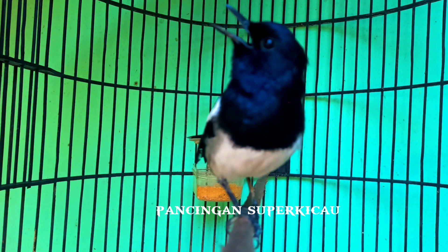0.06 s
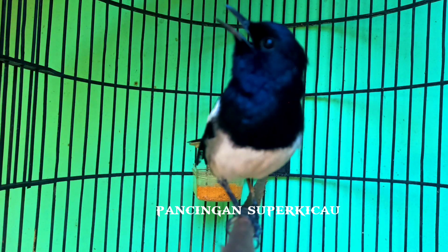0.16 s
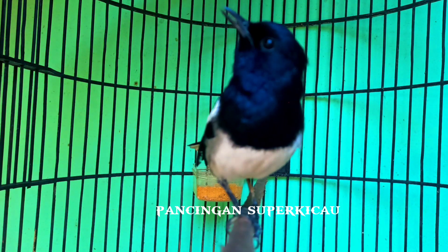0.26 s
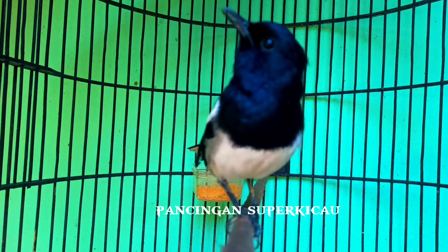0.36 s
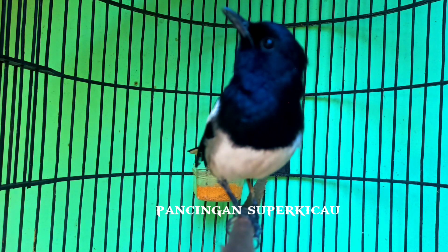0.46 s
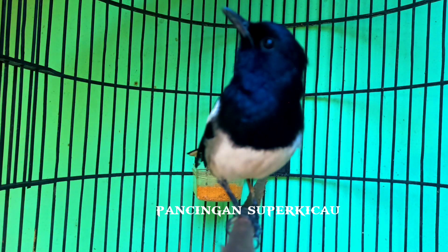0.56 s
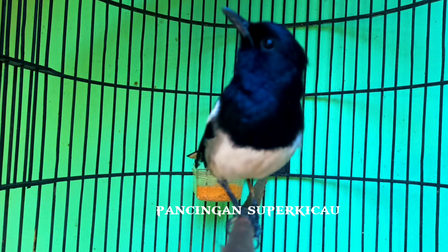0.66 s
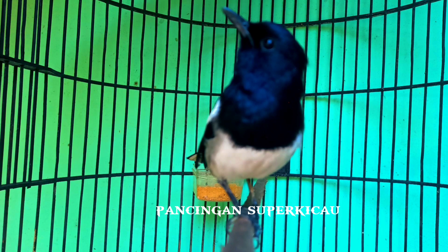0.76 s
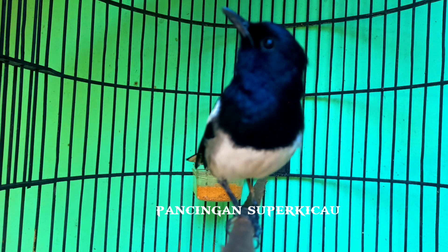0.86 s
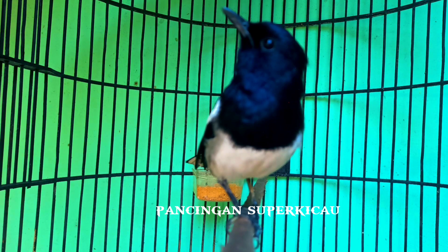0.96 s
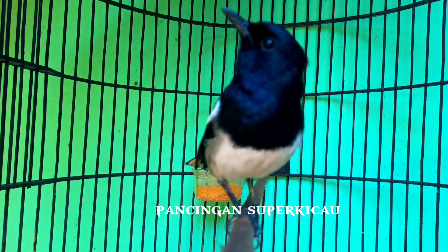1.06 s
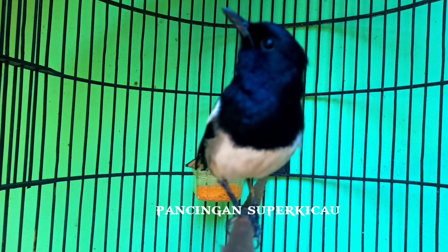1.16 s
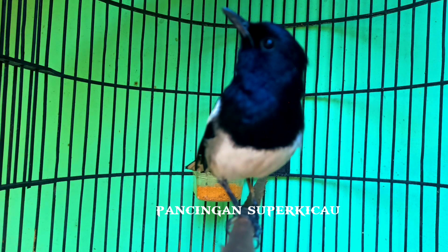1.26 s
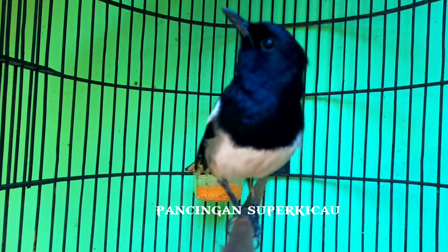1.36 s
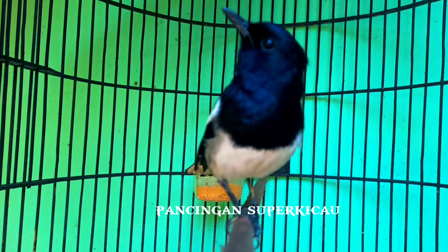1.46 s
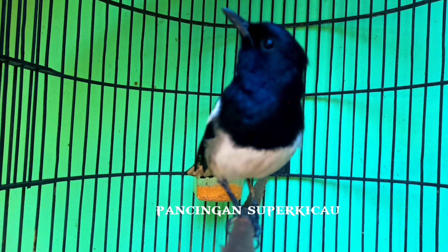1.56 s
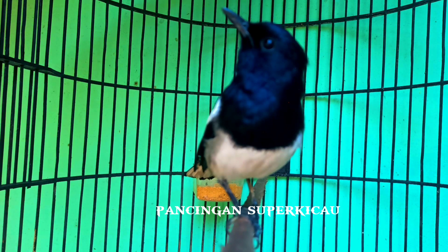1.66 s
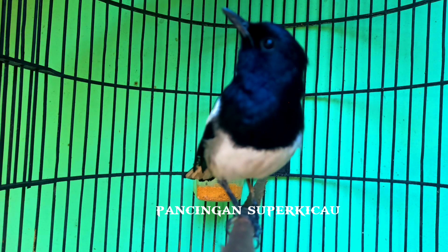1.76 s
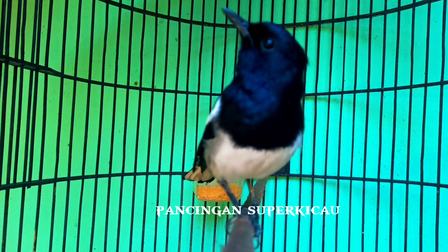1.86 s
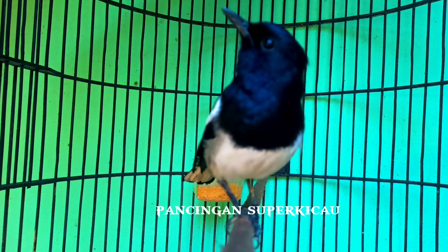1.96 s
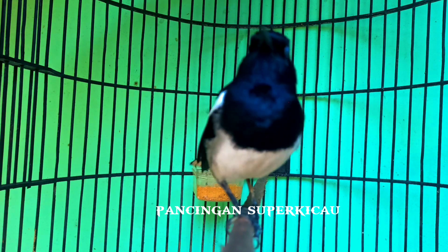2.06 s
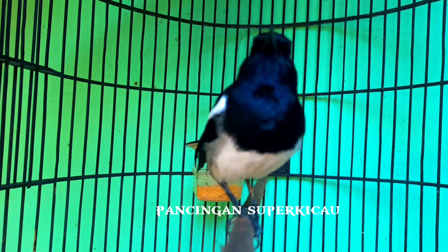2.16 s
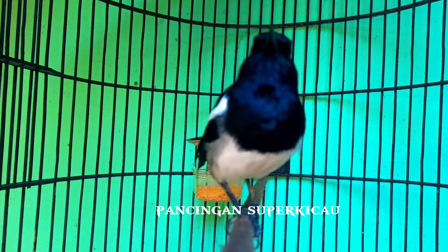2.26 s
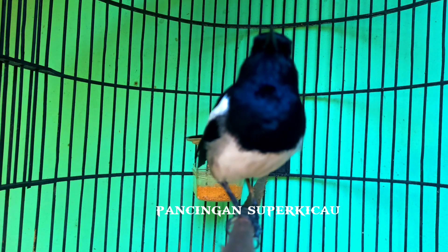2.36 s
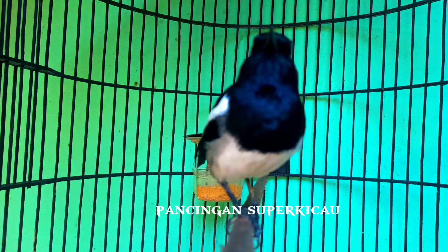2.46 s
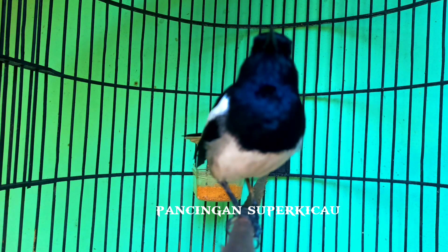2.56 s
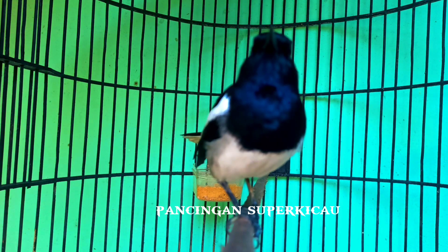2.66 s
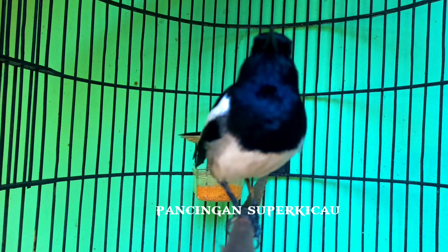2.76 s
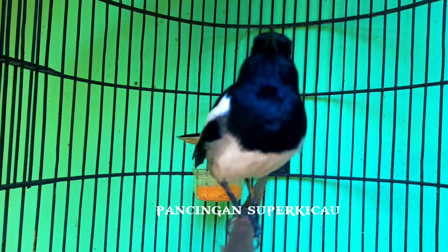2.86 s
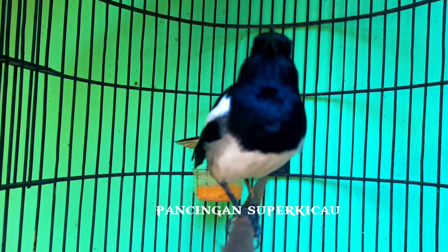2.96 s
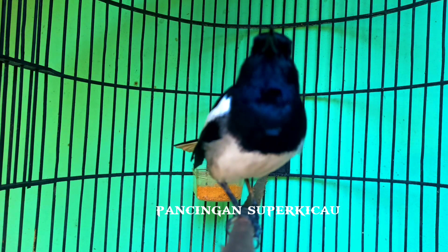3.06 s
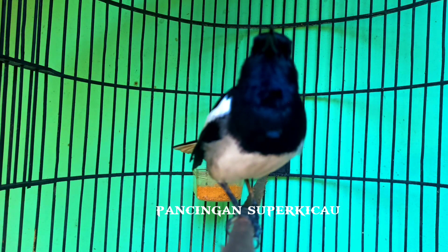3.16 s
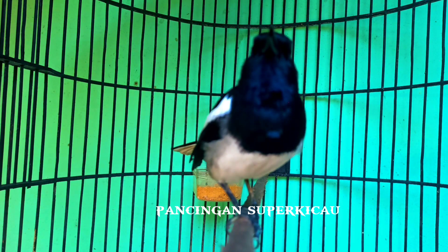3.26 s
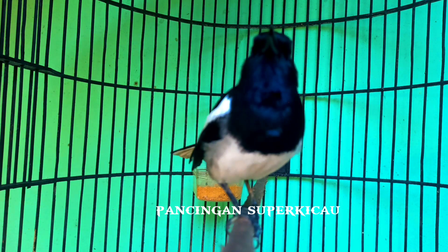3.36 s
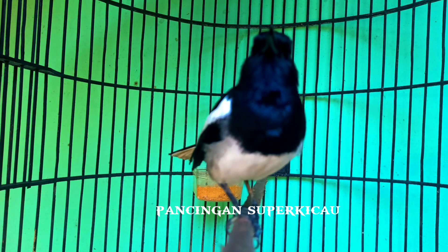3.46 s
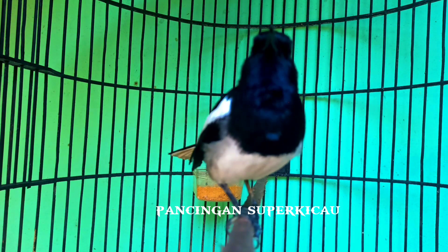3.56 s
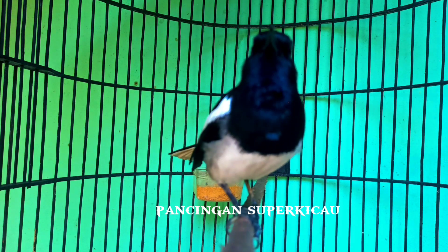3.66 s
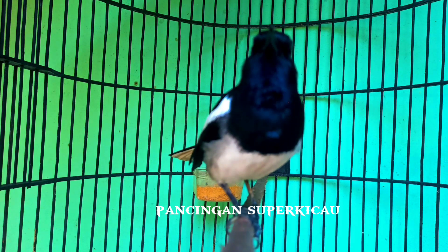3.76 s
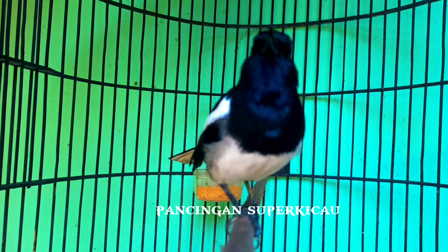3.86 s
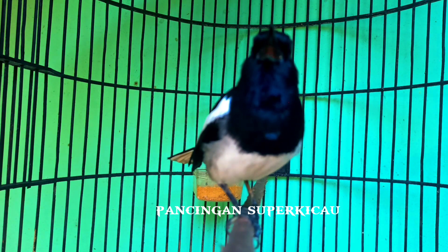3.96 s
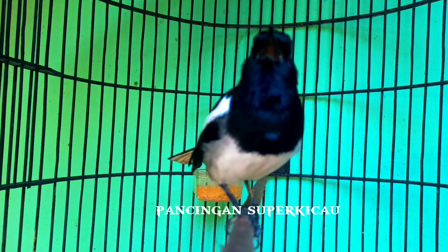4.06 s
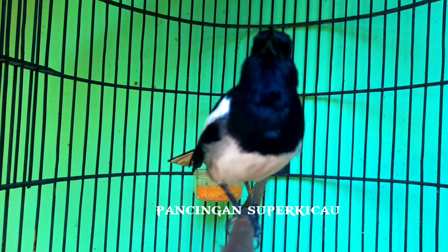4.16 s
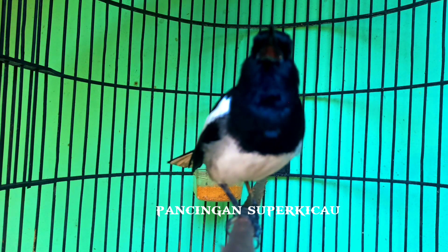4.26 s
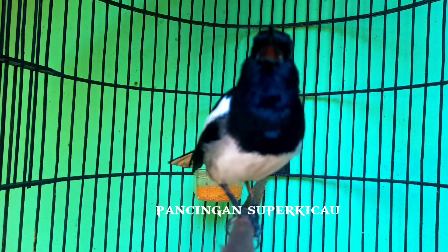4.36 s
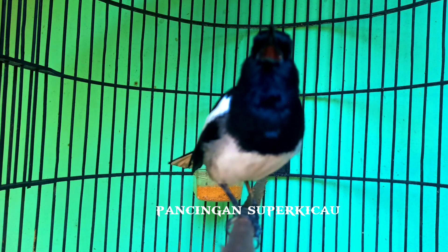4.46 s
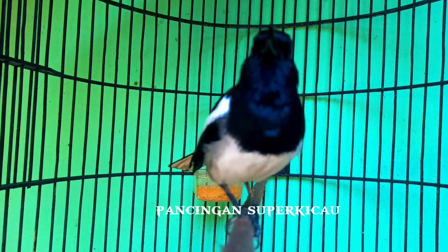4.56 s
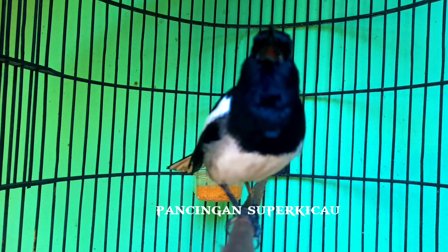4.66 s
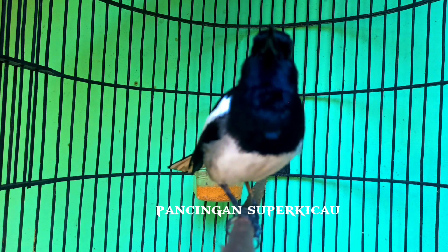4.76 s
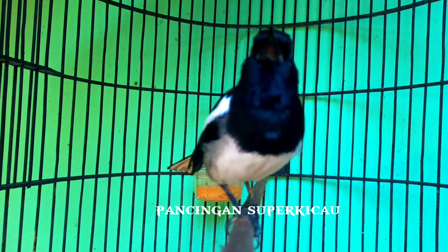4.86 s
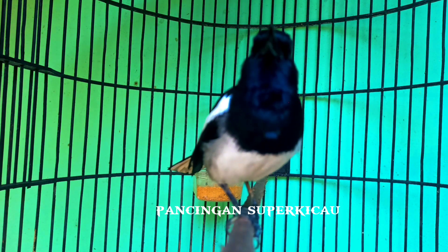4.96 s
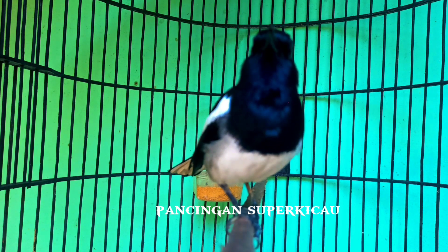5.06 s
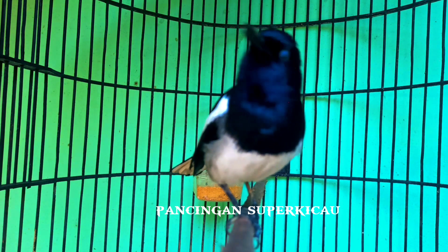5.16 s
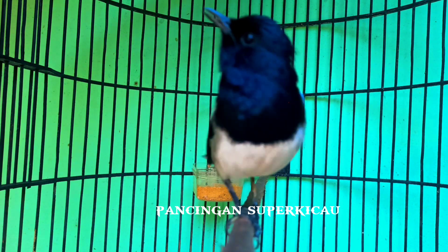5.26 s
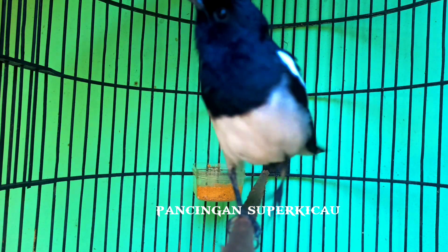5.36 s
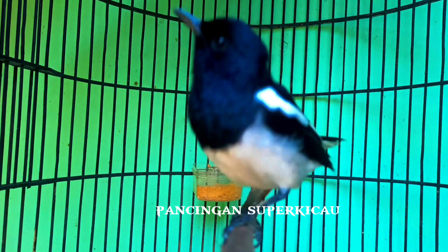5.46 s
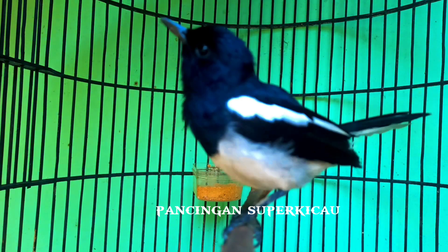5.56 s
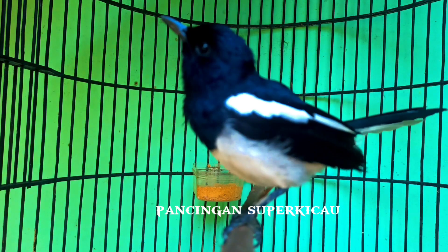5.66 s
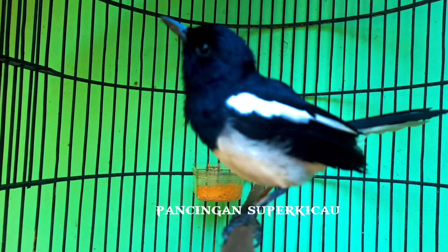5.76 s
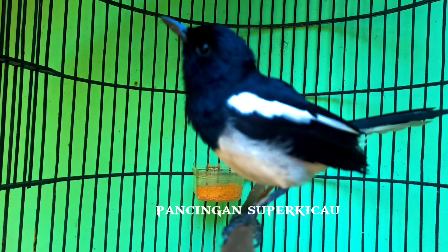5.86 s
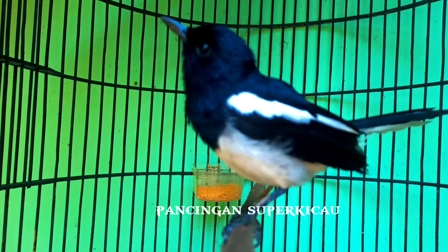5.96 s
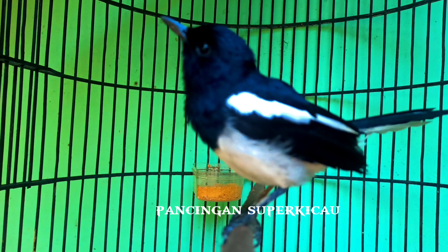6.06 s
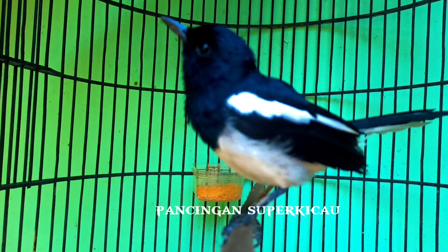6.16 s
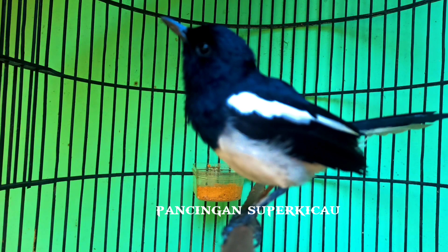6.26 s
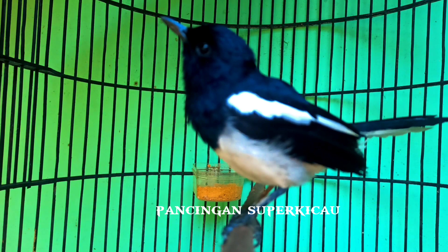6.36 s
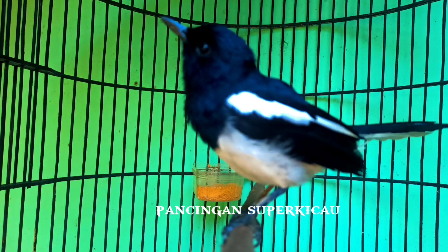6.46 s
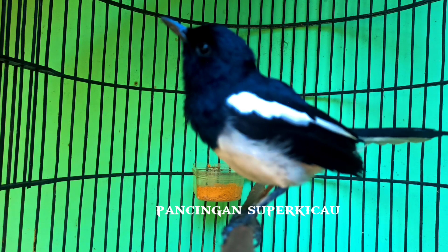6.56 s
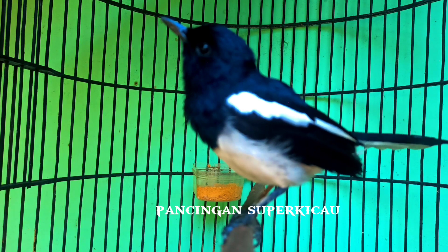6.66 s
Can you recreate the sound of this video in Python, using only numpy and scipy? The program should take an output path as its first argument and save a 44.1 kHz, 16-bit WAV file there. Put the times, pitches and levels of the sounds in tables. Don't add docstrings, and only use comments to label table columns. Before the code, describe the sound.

A caged songbird whistles loud clear notes, a quick warble and a short rasp, while neighbouring birds cheep and buzz in an echoing yard.

```python
import sys
import numpy as np
from scipy import signal
from scipy.io import wavfile
from scipy.ndimage import uniform_filter1d, minimum_filter1d

SR = 44100
rng = np.random.default_rng(int(sys.argv[2]) if len(sys.argv) > 2 else 0)


def to_wav(s):
    ch = np.atleast_2d(s).T
    pcm = np.round(np.clip(ch, -1, 1) * 32767)
    wavfile.write(sys.argv[1], SR, pcm.astype(np.int16))


def amplitude_ratio(level_db):
    exponent = np.asarray(level_db, float) / 20
    return 10 ** exponent


N = 295911


def evened(x):
    return x / np.sqrt(np.mean(x ** 2) + 1e-20)


def read(points, hz):
    f, value = np.transpose(points)
    return np.interp(np.log(hz + 1), np.log(f + 1), value)


def slow(rate_hz):
    return evened(signal.lfilter(*signal.butter(2, rate_hz, fs=SR), rng.standard_normal(N)))


def highpass(x, hz):
    return signal.lfilter(*signal.butter(2, hz, "high", fs=SR), x)


def resonate(x, hz, width_hz):
    b, a = signal.iirpeak(hz, hz / width_hz, SR)
    return signal.lfilter(b, a, signal.lfilter(b, a, x))


def noise(points, patchy_db):
    hz = np.fft.rfftfreq(1024, 1 / SR)
    a, b, patches = rng.standard_normal((N // 256 + 5, 513, 3)).T
    patches = uniform_filter1d(patches, size=10, axis=0)
    patches = evened(uniform_filter1d(patches, size=20, axis=1))
    z = (a + 1j * b) * amplitude_ratio(read(points, hz)[:, None] + patchy_db * patches)
    return evened(signal.istft(z, nperseg=1024, noverlap=768)[1][:N])


def motor():
    # f/Hz, level/dB per Hz
    rumble = [(18, -46), (30, -26.5), (64, -14.5), (84, -9.5), (112, 1.5), (420, -18), (552, -20),
              (955, -28), (1100, -29.5), (1800, -38), (2340, -63), (3960, -120)]
    # t/s, level/dB
    town = [(0, -57), (.6, -53.5), (3.6, -54), (5.1, -50.5), (6.71, -55)]
    motor_db = [-20.5, 7, 2.5, -3.5, -5, -7, -8, -5.5, -6.5]
    # t/s, length/s, level/dB
    ducks = [
        (3.988, 0.26, -10),
        (4.313, 0.26, -8.5),
        (4.718, 0.13, -8),
        (4.906, 0.16, -11.5),
    ]
    t = np.arange(N) / SR
    ducked_db = sum(db * (t > s) * (t < s + length) for s, length, db in ducks)
    ducked_db = uniform_filter1d(ducked_db, size=1000)
    turn = 2 * np.pi * np.cumsum(49.1 + 1.0 * slow(3.9)) / SR
    orders = sum(amplitude_ratio(d + 1 * slow(6)) * np.sin(k * turn + k * k) for k, d in enumerate(motor_db, 1))
    level_db = np.interp(t, *np.transpose(town)) + ducked_db + .8 * slow(1.6)
    return amplitude_ratio(level_db) * (noise(rumble, patchy_db=2.6) + amplitude_ratio(-8.5) * orders)


def insect_hiss():
    # f/Hz, level/dB per Hz
    hiss = [(900, -40.5), (1500, -9.5), (2600, -9.5), (3500, -9.5), (4600, -7.5), (5300, -17), (5900, -18),
            (6500, 0), (7500, -7.5), (8450, -16.5), (8700, -25.5), (11400, -30), (11700, -16.5),
            (15500, -23.5)]
    return amplitude_ratio(-66) * noise(hiss, patchy_db=2.5)


def yard(x, start_s, size):
    # f/Hz, t/s
    ring_time = [(1000, 0.66), (1800, 0.26), (2800, 0.45), (4100, 0.54), (5000, 0.47), (8000, 0.55),
                 (14000, 0.09)]
    taps = np.zeros(SR)
    at = np.arange(round(start_s * SR), SR - 20, 20)
    spread = rng.integers(0, 20, SR)[:len(at)]
    taps[at + spread] = rng.choice([-1., 1.], SR)[:len(at)]
    hz, t, z = signal.stft(taps, SR, nperseg=256)
    fading = amplitude_ratio(-60 * t / (size * read(ring_time, hz)[:, None]))
    tail = signal.istft(z * fading, SR, nperseg=256)[1]
    return signal.fftconvolve(x, tail / np.linalg.norm(tail))[:N]


def wall_echoes(near):
    # t/s, level/dB
    walls = [
        (.003, -24),
        (.007, -32.5),
        (0.013, -19.5),
    ]
    dull = signal.lfilter(*signal.butter(2, 12000, fs=SR), near)
    return sum(amplitude_ratio(db) * np.pad(dull, (round(s * SR), 0))[:N] for s, db in walls)


def shaped(calls, shape):
    risen, held, start_db, end_db = shape
    u = np.array([0, risen, max(held, risen + .01), 1])
    db = np.array([start_db, 0, 0, end_db])
    strokes = []
    for s, length, *hz, top_db in calls:
        pitch = hz[0] + (hz[-1] - hz[0]) * u
        strokes.append(np.transpose([s + length * u, pitch, top_db + db]))
    return strokes


def voice(strokes, edge_s):
    t, gate = np.arange(N) / SR, np.zeros(N)
    rows = np.concatenate(strokes)
    s, *columns = rows[np.diff(rows[:, 0], prepend=-1) > .002].T
    for rows in strokes:
        gate[max(round(rows[0][0] * SR) - 9, 0):round(rows[-1][0] * SR) + 9] = 1
    for _ in range(2):
        gate = uniform_filter1d(gate, round(edge_s * SR))
    return abs(gate), [uniform_filter1d(np.interp(t, s, c), size=200) for c in columns]


def pure_tones(strokes, edge_s, unsteady_hz):
    out, waver = np.zeros(N), unsteady_hz * slow(130)
    for rows in strokes:
        s, hz, db = np.transpose(rows)
        at = np.arange(round(s[0] * SR), round(s[-1] * SR))
        turn = 2 * np.pi * np.cumsum(np.interp(at / SR, s, hz) + waver[at]) / SR
        edges = signal.windows.tukey(len(at), min(2 * edge_s * SR / len(at), 1))
        tone = np.sin(turn) + amplitude_ratio(-49.0) * np.sin(2 * turn)
        out[at] += np.sqrt(2) * amplitude_ratio(np.interp(at / SR, s, db)) * edges * tone
    return out


def buzzer():
    # t/s, length/s, throat pitch factor, upper ridge level/dB, level/dB
    buzzes = [
        (0.65, 0.69, 1.016, -0.5, -44.5),
        (2.03, 0.18, 0.97, -6, -69),
        (2.383, 0.67, 0.996, 1, -43),
    ]
    # f/Hz, width/Hz, level/dB
    buzz_body = [(2500, 620, -22.5), (3164, 450, -17), (3613, 190, -12), (3860, 160, -8),
                 (4000, 150, -13.5), (4340, 162, 1.5), (4616, 150, -2), (4800, 200, -17), (5300, 590, -23),
                 (6100, 200, -23.5), (6480, 340, -16), (6920, 140, -20), (7166, 250, -18.5),
                 (7556, 170, -8), (7825, 220, -20), (8340, 470, -19)]
    # share risen, share held, start level/dB, end level/dB
    buzz_shape = (0.12, 2, -3, -10)
    # lowest f/Hz, highest f/Hz
    ridge_hz = (4450, 4700)
    calls = [(s, length, factor, db) for s, length, factor, _, db in buzzes]
    gate, (_, db) = voice(shaped(calls, buzz_shape), .012)
    turns = np.cumsum(290 * (1 + .12 * slow(60))) / SR
    pulses = np.diff(np.floor(turns), prepend=0) * amplitude_ratio(3 * slow(200))
    puffs = np.exp(-(turns % 1) / .4) * rng.standard_normal(N)
    drive = evened(pulses) + 1.3 * evened(puffs)
    throat = np.zeros(N)
    for s, length, factor, ridge_db, _ in buzzes:
        at = slice(round((s - .03) * SR), round((s + length + .03) * SR))
        rings = 0
        for k, (f, width_hz, d) in enumerate(buzz_body):
            level = amplitude_ratio(d + ridge_db * (ridge_hz[0] < f < ridge_hz[1]))
            rings = rings + (-1) ** k * level * resonate(drive[at], f * factor, width_hz)
        throat[at] = evened(rings)
    lowpass = signal.butter(12, 8600, fs=SR, output="sos")
    return gate * amplitude_ratio(db) * signal.sosfilt(lowpass, throat)


def far_whistler():
    # t/s, length/s, from f/Hz, to f/Hz, level/dB
    whistles = [(.105, 0.066, 1591, 1556, -37.5), (.42, 0.037, 1625, 1540, -38.5),
                (.515, 0.046, 1591, 1627, -34), (.555, 0.12, 1597, 2047, -35),
                (.755, 0.022, 2430, 2160, -44.5), (.79, 0.055, 2135, 2180, -30.5),
                (.855, 0.041, 2118, 2161, -30), (1.045, 0.078, 1600, 1570, -38.5),
                (1.115, 0.066, 1610, 1374, -40), (.462, 0.027, 1610, 1568, -47),
                (.488, .04, 1560, 1528, -46), (6.0, 0.068, 3480, 3465, -69.5),
                (6.19, 0.049, 3620, 3580, -71), (6.27, 0.091, 3520, 3310, -74)]
    # share risen, share held, start level/dB, end level/dB
    whistle_shape = (1.11, -0.82, -4, -23)
    return pure_tones(shaped(whistles, whistle_shape), 0.007, 4.6)


def glider():
    # t/s, length/s, from f/Hz, to f/Hz, level at the highest pitch/dB
    slides = [
        (0.256, .068, 3378, 1370, -39.5),
        (0.261, 0.021, 3034, 2946, -44.5),
        (.32, .04, 1520, 1380, -50),
        (.255, .02, 3550, 3300, -46),
        (0.589, .07, 3470, 4190, -60.5),
        (0.994, 0.024, 1310, 1970, -54),
        (1.001, 0.049, 824, 1562, -39),
        (3.315, 0.05, 3777, 4800, -50.5),
        (4.611, 0.013, 4540, 5040, -53),
    ]
    u, strokes = np.linspace(0, 1, num=7), []
    for s, length, from_hz, to_hz, top_db in slides:
        bend, db_per_octave = (1.3, 25.5) if to_hz > from_hz else (1, 5)
        hz = from_hz + (to_hz - from_hz) * u ** bend
        db = top_db + db_per_octave * np.log2(hz / hz.max())
        strokes.append(np.transpose([s + length * u, hz, db]))
    return pure_tones(strokes, 0.002, 57)


def rising_whistler():
    # t/s, f/Hz, level/dB
    rises = [
        [(0.004, 1067, -60), (0.024, 1304, -52), (0.046, 1434, -48), (0.08, 1514, -55), (0.112, 1606, -50.5)],
        [(4.2, 3420, -41.5), (4.22, 3536, -45), (4.254, 3644, -41.5), (4.3, 3694, -45), (4.34, 3780, -45.5),
         (4.4, 3860, -53), (4.44, 3930, -56)],
        [(4.575, 4120, -48.5), (4.6, 4320, -47), (4.614, 4340, -37), (4.624, 4414, -42), (4.636, 4720, -46)],
        [(5.66, 3480, -69), (5.682, 3810, -64.5), (5.71, 4050, -59.5), (5.734, 4580, -56), (5.75, 5094, -60),
         (5.776, 5160, -59), (5.82, 5207, -69), (5.86, 5120, -64)],
    ]
    return pure_tones(rises, 0.004, 25)


def cheeper():
    # t/s, length/s, from f/Hz, to f/Hz, level/dB
    cheep_calls = [(.075, 0.086, 5247, 5270, -31), (1.36, 0.077, 5390, 5240, -33.5),
                   (1.38, 0.052, 5130, 5180, -41), (3.245, 0.059, 5310, 5203, -30.5),
                   (3.485, 0.067, 5200, 5140, -32), (3.695, 0.069, 5250, 5170, -32),
                   (3.905, 0.061, 5305, 5210, -30), (4.09, .07, 5350, 5330, -49.5),
                   (4.165, .035, 5340, 5290, -54), (4.19, 0.054, 5350, 5340, -49.5),
                   (4.235, 0.045, 5340, 5300, -52.5), (4.275, .035, 5340, 5350, -56.5),
                   (4.32, 0.057, 5340, 5300, -41.5), (4.385, 0.096, 5320, 5340, -56),
                   (5.255, 0.08, 5138, 5163, -31.5), (6.182, .1, 5180, 5320, -32.5),
                   (.02, .05, 5200, 5270, -52.5)]
    # share risen, share held, start level/dB, end level/dB
    cheep_shape = (0.47, 0.68, -12.5, -21)
    return pure_tones(shaped(cheep_calls, cheep_shape), 0.0045, 13)


def scrapes():
    # t/s, level/dB, centre f/Hz, width/Hz, length/s
    puffs = [(0.24, -60, 6500, 2500, 0.05), (.275, -54, 3500, 500, 0.044), (.01, -58.5, 2300, 600, .06),
             (3.4, -55.5, 1500, 2500, .006), (3.1, -52.5, 1800, 2500, 0.011),
             (3.412, -50, 3000, 500, 0.014), (3.99, -62, 1300, 1200, .05), (3.88, -62, 6800, 1500, .1),
             (0.669, -57.5, 6400, 510, 0.16), (1.705, -62, 2740, 696, 0.032),
             (1.87, -62.5, 6590, 690, 0.12), (3.501, -62, 6320, 400, 0.071),
             (3.5725, -34, 3000, 900, 0.0057), (3.61, -36, 4100, 400, 0.0068),
             (3.622, -43.5, 3490, 2310, 0.015), (4.297, -47, 2935, 2850, .02),
             (4.691, -54, 3000, 2930, .012), (3.584, -37, 6200, 160, 0.011), (3.588, -57, 7400, 300, .006),
             (4.29, -46, 5400, 700, 0.017), (4.31, -53, 5160, 600, .025), (4.2857, -44, 2400, 150, 0.015),
             (4.2926, -39.5, 7260, 148.3, 0.014), (5.485, -60.5, 7500, 1000, 0.016),
             (5.488, -57.5, 4070, 7200, 0.0066), (5.51, -58.5, 2900, 2000, 0.0072),
             (5.74, -63, 6400, 400, 0.076), (5.514, -66.5, 1220, 200, 0.027), (6.58, -69, 7800, 907, 0.03),
             (6.66, -63, 6600, 502.5, 0.072)]
    out = np.zeros(N)
    for s, db, hz, width_hz, length in puffs:
        puff = resonate(rng.standard_normal(8192), hz, width_hz)[:max(round(length * SR), 32)]
        puff = amplitude_ratio(db) * evened(puff) * signal.windows.tukey(len(puff), .5)
        part = out[round(s * SR):][:len(puff)]
        part += puff[:len(part)]
    return out


def upper_notes():
    # t/s, f/Hz, level/dB, beak opening/dB
    opening = [
        [(0.0, 4190, -16.5, 5.5), (0.008, 4014, -24.5, 3), (0.032, 3997, -15, 4.5), (0.058, 3933, -26.5, 6),
         (0.078, 3990, -19, 7.5), (0.1, 3937, -30.5, 8.5)],
        [(0.104, 3935, -28, 6.5), (0.148, 3962, -21.5, 9), (0.21, 3979, -17.5, 4.5), (0.22, 4150, -31, 6.5)],
    ]
    grace = [(3.577, 3217, -30.5, -2.5), (3.598, 2999, -12, -1.5), (3.623, 2970, -17, -1),
             (3.63, 2891, -23.5, -2.5), (3.638, 2740, -31, -5)]
    level_note = [(3.957, 3526, -36, -3.5), (3.964, 3484, -17, -2.5), (3.974, 3585, -15, 1.5),
                  (4.023, 3627, -14.5, -0.5), (4.077, 3609, -15.5, -6), (4.172, 3480, -10.5, -7),
                  (4.19, 3291, -27, -5), (4.198, 3333, -40.5, 3.5)]
    slide = [(4.293, 4720, -33, 9), (4.301, 4695, -18.5, 5.5), (4.339, 4204, -15.5, -4),
             (4.36, 4150, -13, -3.5), (4.389, 4063, -13.5, -4.5), (4.439, 4009, -13.5, -3),
             (4.541, 4055, -7.5, -2.5), (4.557, 4082, -18.5, 1), (4.569, 3826, -34.5, -2)]
    short_slide = [(4.692, 4638, -26, 3.5), (4.706, 4360, -17, -6.5), (4.722, 4216, -12.5, 5.5),
                   (4.747, 4156, -15, -4.5), (4.765, 4200, -16.5, -6), (4.771, 3887, -26, -6.5)]
    return [opening[0] + opening[1], grace, level_note, slide, short_slide]


def lower_notes():
    # t/s, f/Hz, level/dB, beak opening/dB
    arch = [(3.108, 2282, -42.5, 1.5), (3.14, 2368, -29.5, 11.5), (3.166, 2508, -15, 8.5),
            (3.21, 2582, -14.5, 2.5), (3.268, 2669, -7, -9.5), (3.326, 2653, -8.5, -8.5),
            (3.35, 2578, -18.5, 0), (3.418, 2551, -10, 3.5), (3.434, 2260, -33, 7.5)]
    scoop = [(3.603, 2402, -35.5, -1.5), (3.61, 2406, -28, 0), (3.648, 2297, -13.5, -1),
             (3.706, 2170, -6, -3.5), (3.792, 2163, -9, -8), (3.827, 2251, -13, 3.5), (3.841, 2193, -17, 5),
             (3.848, 2213, -36, -3)]
    warble_in = [(4.744, 3124, -45, -2), (4.758, 3245, -33.5, 1), (4.782, 3017, -14.5, 0),
                 (4.803, 3290, -25.5, 4), (4.824, 3312, -32, 3.5)]
    warble_dip = [(4.826, 3240, -28, 3), (4.83, 3230, -20, 5), (4.851, 3010, -12, 4),
                  (4.865, 2784, -16.5, 1.5), (4.89, 3110, -12.5, 3.5), (4.899, 3267, -18.5, 2.5)]
    warble = [(4.901, 3306, -14, -2), (4.917, 3516, -9, -3), (4.925, 3574, -16, -6),
              (4.951, 3572, -13.5, -3.5), (4.965, 3442, -10.5, -2), (4.976, 3282, -24.5, -2.5)]
    trill = [
        [(4.979, 3100, -19.5, -0.2), (4.989, 3080, -13.5, -0.3), (5.0, 3233, -29, -0.3)],
        [(5.003, 3160, -28.5, -0.3), (5.009, 3036, -16, 0.1), (5.015, 2921, -14, -1.7),
         (5.033, 3092, -17.5, 0.7)],
        [(5.036, 2828, -17, -2.5), (5.044, 2877, -12.5, -1), (5.052, 3024, -16.5, -1.6),
         (5.064, 2767, -30.5, 0.1)],
    ]
    closing = [(5.235, 2130, -34, 11.5), (5.243, 2101, -21.5, 0), (5.258, 2424, -23, -3.5),
               (5.289, 2403, -23.5, 4.5), (5.316, 2244, -26.5, 2.5), (5.336, 2218, -43, 2.5)]
    return [arch, scoop, warble_in, warble_dip, warble, trill[0], trill[1] + trill[2], closing]


def singer():
    # start t/s, end t/s, rate f/Hz, swing/Hz
    rasp = (5.253, 5.334, 130, 200)
    # start t/s, end t/s, swing/Hz, rate f/Hz
    flutter = (4.79, 4.915, 28, 160)
    order_db = [-32.5, -42.5, -36.5, -45, -45.5, -33]
    lower_order_db = [-0.47, 4, 0, -0.1, -1.3, 1.05]
    # f/Hz, level/dB
    overtone_colour = [(4400, -3.5), (5200, -5), (6500, -3), (8100, 2.5), (8650, -30), (9500, -14), (10500, -33),
                       (12000, -1), (14000, 1), (15500, 7)]
    # f/Hz, level/dB
    throat = [(1000, -42), (2000, -33.5), (3600, -7), (4200, -23), (4800, -23), (5300, -37.5),
              (6300, -30.5), (7300, -13), (8400, -25), (9400, -30), (11500, -37.5)]
    mix_orders = [(1, 1), (1, -1), (2, -1), (-1, 2), (2, 1), (3, -2), (0, 2), (0, 3)]
    gate_a, (hz_a, db_a, tone_a) = voice(upper_notes(), 0.0015)
    gate_b, (hz_b, db_b, tone_b) = voice(lower_notes(), 0.0015)
    t = np.arange(N) / SR
    rasp_start, rasp_end, rasp_hz, rasp_swing_hz = rasp
    rasping = uniform_filter1d(1. * (t > rasp_start) * (t < rasp_end), size=200)
    since = t - rasp_start
    wobble = 2 * np.pi * (rasp_hz - 380 * since) * since
    pulse = uniform_filter1d(signal.sawtooth(wobble, .15), size=40)
    hz_b = hz_b + rasping * rasp_swing_hz * (pulse + .15 * slow(300))
    a = np.sqrt(2) * gate_a * amplitude_ratio(db_a + 0.46 * slow(100))
    b = np.sqrt(2) * gate_b * amplitude_ratio(db_b + 0.28 * slow(77.25) + 4.5 * rasping * np.sin(wobble - .9))

    flutter_start, flutter_end, flutter_swing_hz, flutter_rate_hz = flutter
    fluttering = (t > flutter_start) * (t < flutter_end) * flutter_swing_hz * slow(flutter_rate_hz)
    turn_a = 2 * np.pi * np.cumsum(hz_a + 4 * slow(140)) / SR
    turn_b = 2 * np.pi * np.cumsum(hz_b + 4 * slow(110) + fluttering) / SR
    total = a + b + 1e-9
    share = np.clip(a / total, 0, 1)
    swing = share * np.cos(turn_a) + (1 - share) * np.cos(turn_b)
    hz = share * hz_a + (1 - share) * hz_b
    tone_db = share * tone_a + (1 - share) * tone_b

    effort_db = np.minimum(20 * np.log10(total) + 9, 0)
    angle = np.arccos(np.clip(swing, -1, 1))
    overtones = 0
    for k, (db, lower_db) in enumerate(zip(order_db, lower_order_db), 2):
        level_db = db + (2 - share) * lower_db + tone_db + read(overtone_colour, k * hz)
        level_db = level_db + 1.7 * slow(21) + 1.9 * slow(160)
        level_db = level_db - (12.5 if k == 2 else 3.5) * rasping + 0.29 * (k - 4.5) * effort_db
        fade = np.clip((15850 - k * hz) / 250, 0, 1)
        overtones = overtones + amplitude_ratio(level_db) * fade * np.cos(k * angle)
    mixes = sum(amplitude_ratio(read(throat, abs(m * hz_a + n * hz_b))) * np.cos(m * turn_a + n * turn_b)
                for m, n in mix_orders)
    breath = amplitude_ratio(-43.5) * slow(290) * swing
    return highpass(total * (swing + overtones + breath) + np.sqrt(a * b) * mixes, 500)


def scene():
    near, cheeps, buzz = singer(), cheeper(), buzzer()
    far, slides, rises = far_whistler(), glider(), rising_whistler()

    wet = yard(amplitude_ratio(-24.5) * near + amplitude_ratio(-20.5) * cheeps, 0.023, 0.9)
    wet += amplitude_ratio(-14.0) * yard(far + .3 * cheeps, 0.037, 2.3)
    neighbours = amplitude_ratio(-1.5) * far + amplitude_ratio(0.0) * slides + amplitude_ratio(2.5) * rises + amplitude_ratio(-4.0) * buzz
    wet += yard(neighbours, 0.003, 0.92)
    wet += amplitude_ratio(-17.0) * yard(near + cheeps, .008, 0.3)

    dry = near + wall_echoes(near) + cheeps + scrapes()
    dry += amplitude_ratio(1.0) * far + amplitude_ratio(-1.5) * slides + amplitude_ratio(3.5) * rises + amplitude_ratio(-5.5) * buzz
    return (dry + wet + insect_hiss() + motor())[None]


def band_limit(x):
    return signal.sosfilt(signal.butter(12, 15670, fs=SR, output="sos"), x)


def record(dry):
    ceiling = 0.35
    peak = uniform_filter1d(-minimum_filter1d(-abs(dry), size=150), size=150)
    held = dry / np.maximum(peak / ceiling, 1) ** 0.6
    held = held + amplitude_ratio(-28.0) * held ** 2
    return band_limit(highpass(held, 60))


dry = scene()
out = record(dry)
to_wav(out)
```